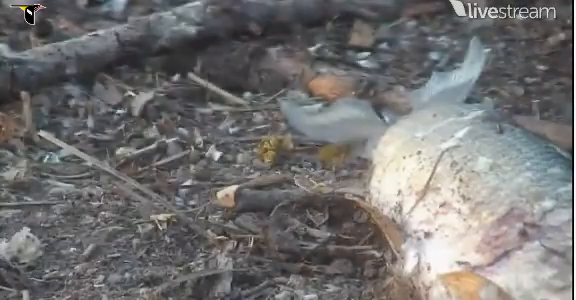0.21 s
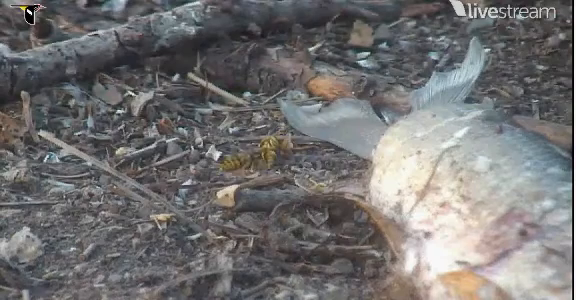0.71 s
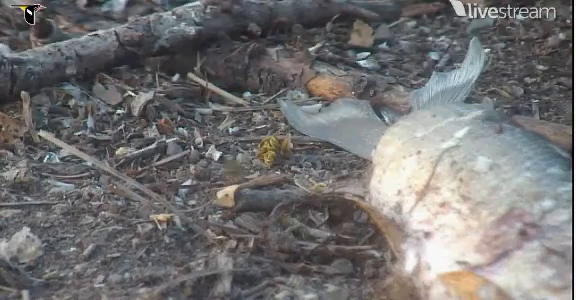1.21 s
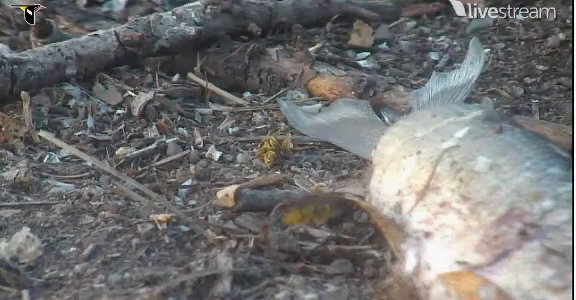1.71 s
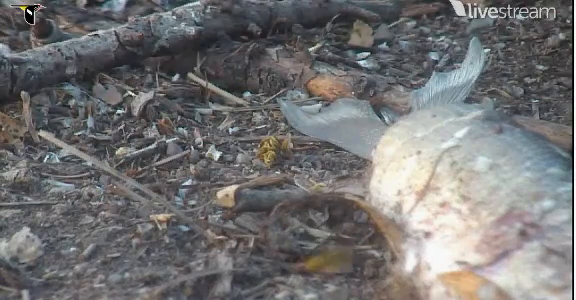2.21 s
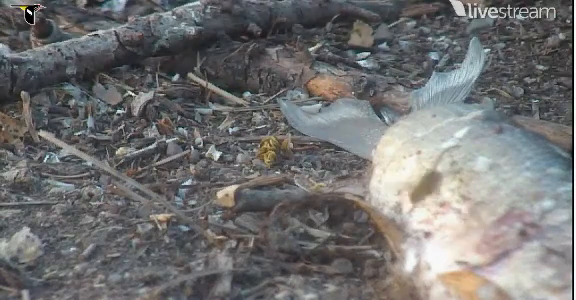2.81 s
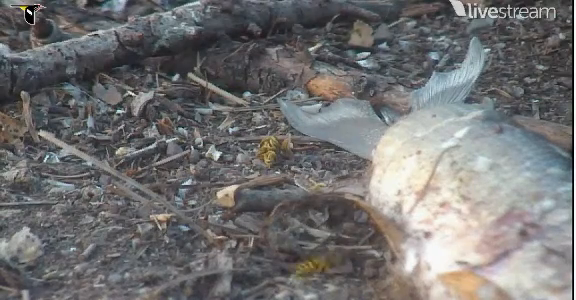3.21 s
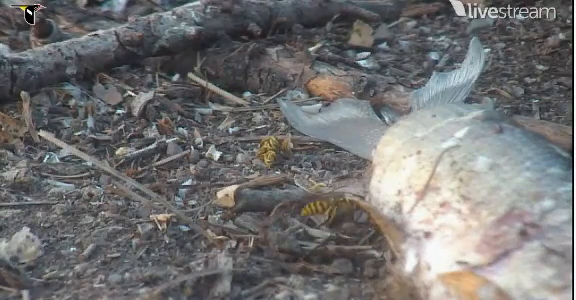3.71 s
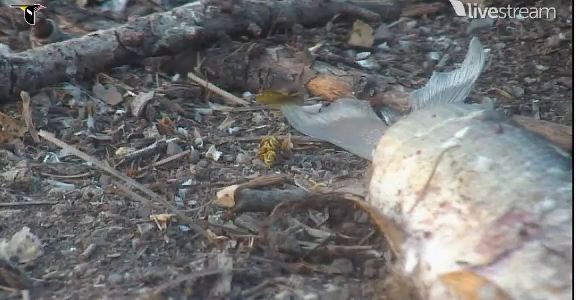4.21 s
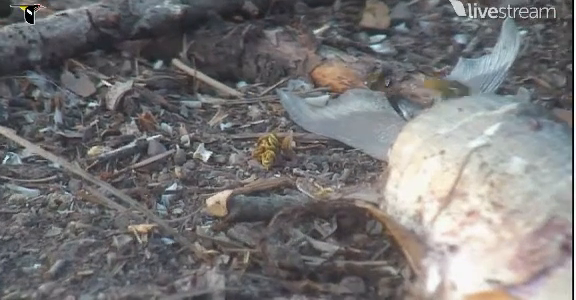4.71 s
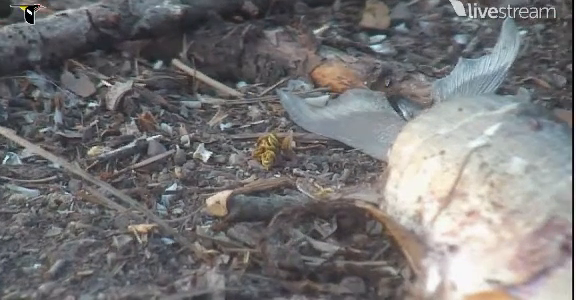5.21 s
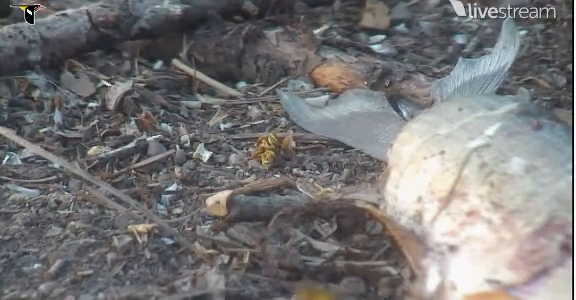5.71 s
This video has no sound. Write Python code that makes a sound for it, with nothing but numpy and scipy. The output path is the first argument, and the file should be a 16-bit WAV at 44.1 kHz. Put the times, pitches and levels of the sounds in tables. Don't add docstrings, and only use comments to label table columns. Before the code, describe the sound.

A steady, low, distant rushing fills an outdoor nest site, with faint electrical hum and thin microphone hiss. The last trace of an earlier call's echo fades at the very start. A bird of prey then gives two clear, high whistles, at about 0.05-0.27 and 0.47-0.75 seconds. After a pause, a lower hoarse whistle begins near 2.0, climbs and cracks briefly into a higher voice at 2.2. Louder, brighter short chirps follow quickly from about 2.35 to 3.47, then three longer, softer whistles at 3.6, 4.0 and 4.4, ending near 4.67. Most calls open with a tiny beak tick and low grace note, scoop quickly upward, hold almost pure with slight rasp and breath, and bend down. Trees and a far bank return faint, dull, scattered echoes. From about 5 seconds to the end near 6, only rushing, hum and hiss remain, nearly centred.

```python
import sys
import numpy as np
from scipy import signal
from scipy.fft import rfft, irfft, next_fast_len
from scipy.io import wavfile
from scipy.ndimage import uniform_filter1d, map_coordinates

SR = 44100
rng = np.random.default_rng(int(sys.argv[2]) if len(sys.argv) > 2 else 0)


def digitize_waveform(pressure):
    field = np.atleast_2d(pressure).T
    bounded = np.clip(field, -1, 1)
    quanta = np.round(bounded * 32767).astype(np.int16)
    wavfile.write(sys.argv[1], SR, quanta)


def gain_from_db(level_db):
    decades = np.asarray(level_db, float) / 20
    return 10 ** decades


N = 261072

# start_s, end_s, pitch_after_scoop_hz, pitch_before_drop_hz, level_after_scoop_db
WHISTLES = [(0.054, 0.271, 3285, 3385, -20), (0.468, 0.736, 3220, 3377, -21.5),
            (2.365, 2.454, 3140, 3135, -15.5), (2.541, 2.673, 3146, 3110, -16.5),
            (2.766, 2.854, 3140, 3137, -14.5), (2.943, 3.039, 3123, 3116, -16),
            (3.139, 3.274, 3123, 3120, -16), (3.375, 3.467, 3145, 3160, -15.5),
            (3.577, 3.793, 3153, 3193, -19), (4.015, 4.283, 3020, 3252, -21.5),
            (4.42, 4.668, 3129, 3205, -20.5)]
# second_partial_db, rasp_db, grace_level_db, grace_last_pitch_hz, slackness
VOICES = [(-43, -50.5, -20.5, 2494, 1.2), (-43.5, -50.5, -21, 2420, 1.1), (-31.5, -48.5, -20, 2416, 1.1),
          (-31, -47.5, -20, 2405, 1.5), (-30, -47, -21, 2420, 1.1), (-31, -46, -23.5, 2397, 1.1),
          (-30, -51, -23.5, 2406, .4), (-31.5, -47.5, -27, 2460, 1.1), (-33.5, -42, -23.5, 2450, 2.4),
          (-35.5, -45, -28, 2310, 0.18), (-35, -43, -20.5, 2400, .3)]
# centre_s, width_s, upper_voice_hz, upper_level_db, pitch_kick_hz
CRACK = (2.225, .0055, 3850, -17, 60)
CLEAR_DB = -35
OPENS_DB = -24
DROP_S, RELEASE_S = .047, 0.0072


def bird():
    # freq_hz, level_db
    breath_spectrum = [(1700, -71), (2300, -40.5), (3300, -34), (4500, -45.5), (5100, -56), (6200, -54),
                       (8000, -59.5), (11500, -65.5), (13000, -66), (15800, -63.5)]
    # freq_hz, level_db
    tick_spectrum = [(1500, -33.5), (2500, 5), (4500, 5), (7000, -13), (12000, -28.5)]
    whistled, whistle_air = whistles()
    low, low_air, clicks = low_notes()
    breath = filtered(rng.standard_normal(N), lambda f: gain_from_db(along(breath_spectrum, f)))
    flutter = gain_from_db(1.2 * wobble(40))
    ticks = filtered(clicks * rng.standard_normal(N), lambda f: gain_from_db(along(tick_spectrum, f)))
    return whistled + low + upper_voice() + ticks + (whistle_air + low_air) * flutter * breath


def whistles():
    # freq_hz, gain_db
    octave = [(4600, -8), (5200, -21.5), (5600, -9), (5850, -1.6), (6100, -1.5), (6300, -9.5), (6750, -3.5)]
    # time_s, pitch_hz, level_db
    broken = [
        (2.021, 2310, -38.5),
        (2.039, 2557, -30.0),
        (2.076, 2743, -19.5),
        (2.136, 2830, -22),
        (2.202, 3077, -17.5),
        (2.228, 3270, -22),
        (2.234, 3162, -14),
        (2.25, 3055, -17.5),
        (2.269, 2820, -39),
    ]
    # second_partial_db, rasp_db
    broken_voice = (-37, -41.5)
    calls = []
    for row, (second_db, rasp_db, _, _, slackness) in zip(WHISTLES, VOICES):
        calls.append((whistle_path(*row, slackness), second_db, rasp_db, 5.5))
    calls.append((broken, *broken_voice, 15.5))

    voice, airflow = np.zeros((2, N))
    shake_hz, shake_db = 9 * wobble(150), 0.4 * wobble(120)
    stir, rough = low_register()
    crack_s, crack_width_s, _, _, kick_hz = CRACK
    for rows, second_db, rasp_db, clears_db in calls:
        span, t, (hz, db), gate = note(rows, edge_s=0.0026)
        since, left = t - t[0], t[-1] - t
        hoarse = gain_from_db(1.3 * (rasp_db - clears_db / 2 + 48))
        low = (stir[span] + hoarse * rough[span]) / np.hypot(1, hoarse)

        opening_db = (3 + 1.2 * (second_db - CLEAR_DB)) * np.exp(-since / 0.0081)
        faint_db = 0.76 * np.minimum(db - OPENS_DB, 0)
        closing_db = -clears_db * since / since[-1] - 4 * near(left, DROP_S, 1)
        rasp_db = rasp_db + faint_db + opening_db + closing_db
        rasp = gain_from_db(rasp_db + 30.5 + 0.5 * (db - OPENS_DB))

        crack = np.exp(-((t - crack_s) / crack_width_s) ** 2)
        surge_db = 4 * np.exp(-((t - crack_s + .009) / .004) ** 2)
        second_db = second_db + along(octave, 2 * hz) - 11 * near(left, RELEASE_S, 0.93)
        second_db = second_db + 2 * shake_db[span] - 9 * crack
        hz = hz + shake_hz[span] + kick_hz * crack
        voice[span] += gate * syrinx(hz, db + shake_db[span] + surge_db, second_db, rasp * low)
        airflow[span] += gate * gain_from_db(0.67 * rasp_db + 39.0)
    return voice, airflow


def whistle_path(start_s, end_s, early_hz, late_hz, db, slackness):
    scoop_s = .047
    t = np.linspace(start_s, end_s, num=80)
    since, left = t - start_s, end_s - t
    hold_s = max(end_s - start_s - scoop_s - DROP_S, .001)
    long = min(hold_s / .08, 1)

    def between(short_value, long_value):
        return short_value + long * (long_value - short_value)

    u = np.clip((since - scoop_s) / hold_s, 0, 1)
    slack = slackness * hold_s * np.sin(np.pi * u ** 0.6)
    hz = early_hz + (late_hz - early_hz) * u - 160 * slack
    held_db = db + 25.5 * (hz - early_hz) / 1000 - 8.5 * slack
    scoop = near(since, scoop_s, between(2.6, 2.2))
    drop = near(left, between(DROP_S, .04), between(2.1, 2.4))
    hz = hz - 257.2 * scoop - 480 * drop

    attack = near(since, 0.034, between(1.1, 1.5))
    fade = near(left, between(0.038, 0.033), between(0.75, 1))
    level_db = held_db + (OPENS_DB - held_db) * attack + (-25 - held_db) * fade
    return np.transpose([t, hz, level_db - 12.5 * near(left, RELEASE_S, 1)])


def low_register():
    swing = gain_from_db(2.7 * wobble(25))
    stir, rough = (swing * (wobble(rate) + 1j * wobble(rate)) for rate in (120, 500))
    wander_hz = 70 * wobble(14)
    return stir * np.exp(2j * np.pi * np.cumsum(wander_hz) / SR), rough


def syrinx(hz, db, second_db, stir):
    partials_db = [-41, -38, -45, -45, -56]
    # freq_hz, gain_db
    throat = [(6000, 12), (7300, -0.5), (8300, 7.5), (9500, -5.5), (11000, -4), (12800, 0), (14200, 1.5),
              (15700, 5)]
    mixes = [(1, -1), (1, 1), (2, -1), (2, 1), (3, -1), (3, 1), (4, -1), (4, 1)]
    mixes_db = [-30.5, -35, -45.5, -52.5, -55.5, -69, -62, -63.5]
    turn = 2 * np.pi * np.cumsum(hz) / SR
    high = 0
    for k, under_db in enumerate(partials_db, start=3):
        audible = k * hz < SR / 2
        high = high + gain_from_db(under_db + along(throat, k * hz)) * np.sin(k * turn) * audible
    low_hz = 0.7567 * np.mean(hz)
    beat = turn - 2 * np.pi * low_hz * np.arange(len(hz)) / SR
    mixed = 0
    for (k, n), under_db in zip(mixes, mixes_db):
        mixed = mixed + gain_from_db(under_db) * np.imag(stir * np.exp(1j * (k * turn + n * beat)))
    return np.sqrt(2) * (gain_from_db(db) * (np.sin(turn) + high) + gain_from_db(second_db) * np.sin(2 * turn) + mixed)


def low_notes():
    voice, airflow, clicks = np.zeros((3, N))
    for start_s, end_s, hz0, hz1, db, second_db in low_note_rows():
        rising = hz1 > hz0
        first_db, last_db = (db - 15, db - 2.0) if rising else (db, db - 3.0)
        first = (start_s, hz0, first_db, second_db - 3.0)
        middle = ((start_s + end_s) / 2, (hz0 + hz1) / 2 - 30, db - 2.5, second_db)
        last = (end_s, hz1, last_db, second_db - 16.0)
        span, t, (hz, level_db, overtone_db), gate = note([first, middle, last], edge_s=0.0018)
        voice[span] += gate * syrinx(hz, level_db, overtone_db, 0)
        clicks[span] += rising * gate * gain_from_db(second_db + 4.5 - 60 * (t - start_s) / .012)
        airflow[span] += gate * gain_from_db(0.32 * level_db + 7)
    return voice, airflow, clicks


def low_note_rows():
    # start_s, end_s, start_hz, end_hz, level_db
    closing = [
        (0.268, 0.275, 2530, 2390, -28.5),
        (0.732, 0.751, 2550, 2390, -43.5),
        (2.261, 2.285, 2570, 2230, -35.5),
        (4.282, 4.29, 2420, 2220, -34),
        (4.667, 4.669, 2370, 2210, -30.5),
    ]
    rows = []
    for (s, *_), (second_db, _, db, hz, _) in zip(WHISTLES, VOICES):
        grace_second_db = db - 16.5 + 0.94 * (second_db - CLEAR_DB)
        rows.append((s - .017, s + .002, hz - 332, hz, db, grace_second_db))
    return rows + [(*row, row[-1] - 30) for row in closing]


def upper_voice():
    at_s, width_s, upper_hz, upper_db, _ = CRACK
    u = (np.arange(N) / SR - at_s) / width_s
    arc_hz = upper_hz - 300 * np.tanh(u ** 2)
    turn = 2 * np.pi * np.cumsum(arc_hz) / SR
    return gain_from_db(upper_db) * np.exp(-u ** 2) * (np.sin(turn) + gain_from_db(-29) * np.sin(2 * turn))


def echoes(x):
    # delay_s, spread_s, level_db
    reflectors = [
        (0.059, 0.0057, -22.5),
        (0.121, 0.098, -28),
        (0.223, 0.011, -26.5),
        (.38, 0.044, -38),
    ]
    # freq_hz, gain_db
    air_loss = [(2000, -7), (2750, -1), (3150, -1), (3500, -3.5), (6500, -6.5), (9000, -19.5),
                (12000, -34.5)]
    t = np.arange(SR // 2) / SR
    paths = np.zeros(len(t))
    for delay_s, spread_s, db in reflectors:
        cluster = np.exp(-((t - delay_s) / spread_s) ** 2) * rng.standard_normal(len(t))
        paths += gain_from_db(db) * cluster / np.linalg.norm(cluster)
    shimmer = gain_from_db(2.03 * wobble(45))
    return shimmer * filtered(signal.fftconvolve(x, paths)[:N], lambda f: gain_from_db(along(air_loss, f)))


def earlier_echo():
    # time_s, pitch_hz, level_db
    tail = [
        (0, 3240, -39),
        (.02, 3320, -51),
        (.045, 3330, -49),
    ]
    out = np.zeros(N)
    span, _, (hz, db), gate = note(tail, edge_s=.002)
    out[span] = gate * gain_from_db(db + 2.5) * np.sin(2 * np.pi * np.cumsum(hz) / SR)
    return out


def rush(patchy_db):
    # freq_hz, density_db_per_hz
    rush_spectrum = [(76, -67), (130, -38.5), (210, -25), (240, -18), (351, -6), (474, -3), (765, 0.5),
                     (1090, -9), (1480, -20.5), (2650, -20), (3110, -29.5), (4200, -35), (6300, -53),
                     (7600, -78.5)]
    # time_s, level_db
    rush_level = [(0.0, -32.5), (0.25, -32), (1.61, -33), (2.19, -32.5), (3.25, -33.5), (3.82, -32),
                  (4.4, -34), (4.83, -34), (5.62, -32.5), (5.92, -34)]
    z = signal.stft(rng.standard_normal(N + 512), nperseg=512)[2]
    field = uniform_filter1d(uniform_filter1d(rng.standard_normal(z.shape), 5, 0), 20, 1)
    patchy = signal.istft(z * gain_from_db(patchy_db * unit(field)), nperseg=512)[1][:N]
    s, db = np.transpose(rush_level)
    swell_db = np.interp(np.arange(N) / SR, s, db) + 1
    return gain_from_db(swell_db) * unit(filtered(patchy, lambda f: gain_from_db(along(rush_spectrum, f))))


def hum():
    # freq_hz, level_db
    lines = [
        (120, -85),
        (240, -59),
        (360, -64),
        (8170, -91),
    ]
    t = np.arange(N) / SR
    out = np.zeros(N)
    for hz, db in lines:
        out += gain_from_db(db + 3 + 1.5 * wobble(6)) * np.sin(2 * np.pi * hz * t + .3 * wobble(5))
    return out


def microphone_hiss():
    # freq_hz, level_db
    hiss_spectrum = [(25, 19), (100, 13), (300, 0.5), (7000, 5.5), (10000, 5.5), (13000, 6), (15800, -2)]
    return gain_from_db(-80.5) * filtered(rng.standard_normal((2, N)), lambda f: gain_from_db(along(hiss_spectrum, f)))


def stereo_side(middle, hiss):
    # freq_hz, left_minus_right_db
    lean_db = [(1000, 0), (1500, -.5), (2400, 0), (3200, .22), (4400, .6), (6200, 3), (9000, 2.5),
               (12000, 2.5), (13500, -2.5), (15500, 2)]
    # freq_hz, level_db
    apart = [(30, -14), (100, -53), (1200, -51), (1600, -16.5), (2200, -27.5), (4000, -56), (5000, -19.5),
             (15000, -12.5)]
    lean = filtered(middle, lambda f: np.tanh(along(lean_db, f) * np.log(10) / (2 * 20)))
    return lean + filtered(rush(patchy_db=9.0), lambda f: gain_from_db(along(apart, f))) + gain_from_db(-5.5) * hiss


def unit(x):
    return x / np.sqrt(np.mean(x ** 2) + 1e-20)


def along(points, hz):
    f, v = np.transpose(points)
    return np.interp(np.log(hz + 1), np.log(f + 1), v)


def wobble(rate):
    return map_coordinates(rng.standard_normal(int(N * rate / SR) + 4), [np.arange(N) * rate / SR])


def filtered(x, response):
    m = next_fast_len(N + SR // 2)
    return irfft(rfft(x, m) * response(np.fft.rfftfreq(m, 1 / SR)), m)[..., :N]


def near(gap_s, reach_s, curve):
    return np.clip(1 - gap_s / reach_s, 0, 1) ** curve


def note(rows, edge_s):
    s, *cols = np.transpose(rows)
    span = slice(round(s[0] * SR), round(s[-1] * SR))
    t = np.arange(span.start, span.stop) / SR
    step = np.diff(s)
    chord = np.diff(cols) / step
    before = np.pad(chord, ((0, 0), (1, 0)), "edge")
    after = np.pad(chord, ((0, 0), (0, 1)), "edge")
    slope = np.where(before * after > 0, 2 * before * after / (before + after + 1e-12), 0)
    i = np.clip(np.searchsorted(s, t) - 1, 0, len(s) - 2)
    u = (t - s[i]) / step[i]
    bend = u * (1 - u) * ((1 - u) * (slope[:, i] - chord[:, i]) - u * (slope[:, i + 1] - chord[:, i]))
    smooth = np.array(cols)[:, i] + step[i] * (u * chord[:, i] + bend)
    gate = np.clip(np.minimum(t - s[0], s[-1] - t) / edge_s, 0, 1)
    return span, t, smooth, np.sin(gate * np.pi / 2)


def scene():
    call = bird()
    hiss = microphone_hiss()
    middle = call + echoes(call) + earlier_echo() + rush(patchy_db=0.68) + hum() + hiss[0]
    side = stereo_side(middle, hiss[1])
    return np.array([middle + side, middle - side])


def roll_off(x):
    return signal.sosfilt(signal.butter(12, 15750, fs=SR, output="sos"), x)


def record(dry):
    edge = np.clip(np.minimum(np.arange(N), np.arange(N)[::-1]) / (.006 * SR), 0, 1)
    return roll_off(dry * edge)


dry = scene()
out = record(dry)
digitize_waveform(out)
```